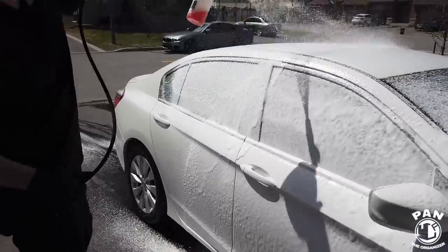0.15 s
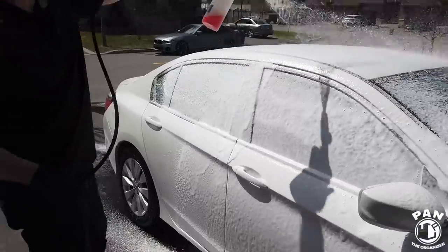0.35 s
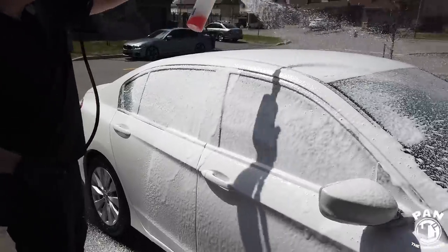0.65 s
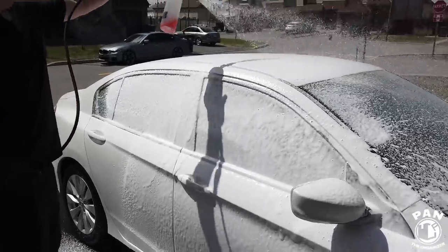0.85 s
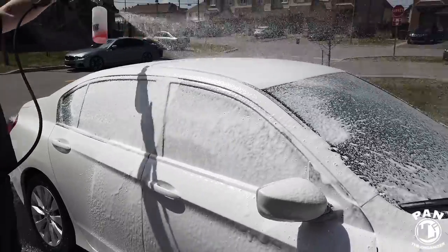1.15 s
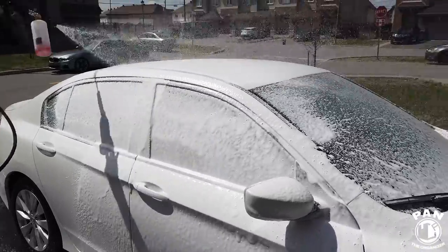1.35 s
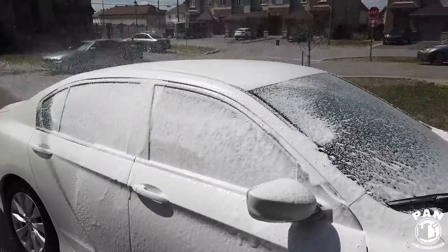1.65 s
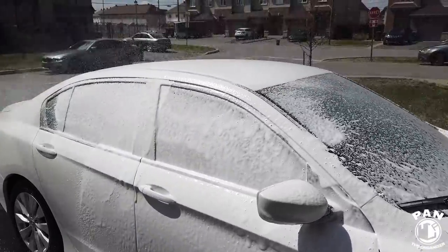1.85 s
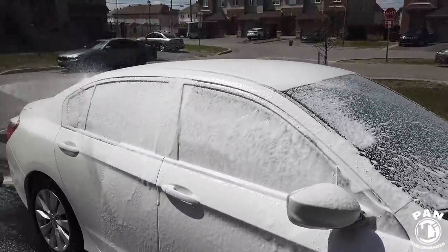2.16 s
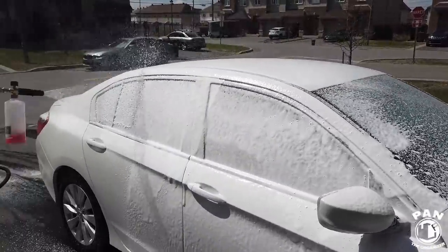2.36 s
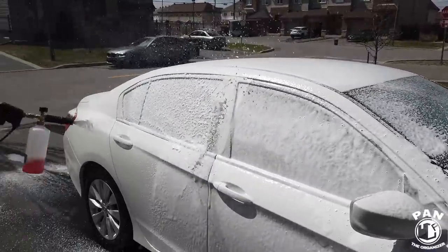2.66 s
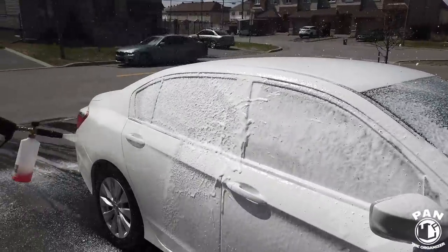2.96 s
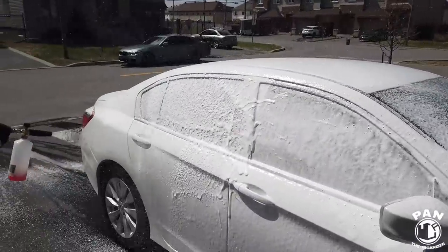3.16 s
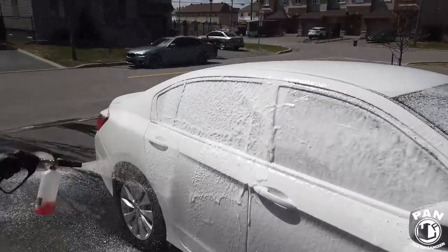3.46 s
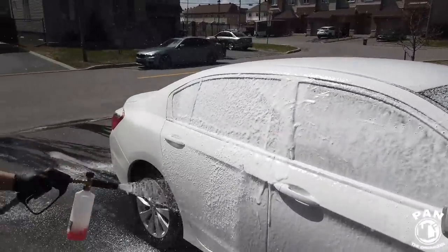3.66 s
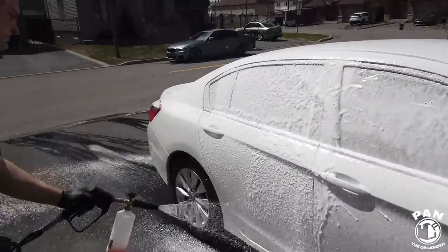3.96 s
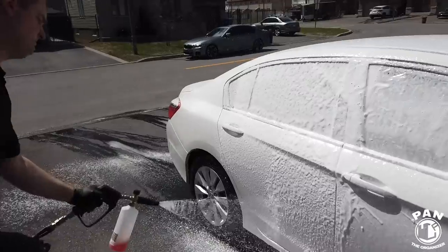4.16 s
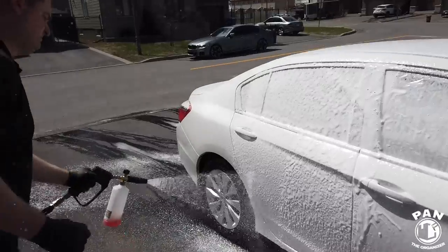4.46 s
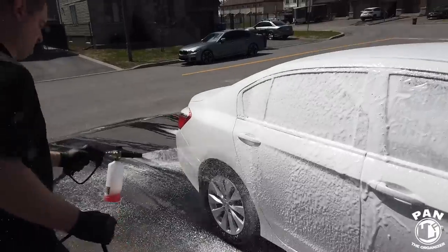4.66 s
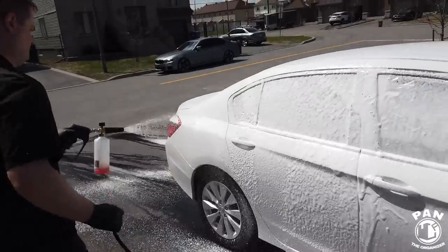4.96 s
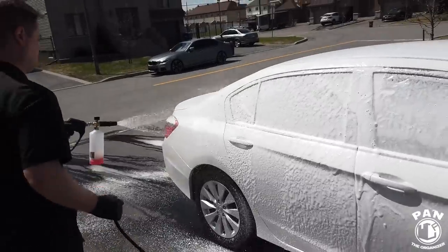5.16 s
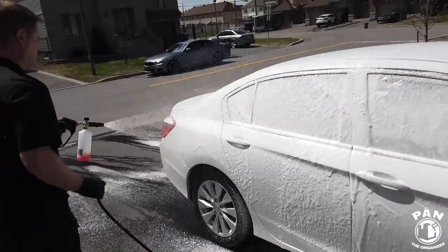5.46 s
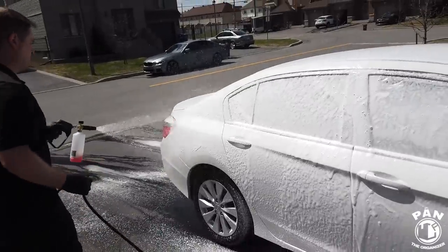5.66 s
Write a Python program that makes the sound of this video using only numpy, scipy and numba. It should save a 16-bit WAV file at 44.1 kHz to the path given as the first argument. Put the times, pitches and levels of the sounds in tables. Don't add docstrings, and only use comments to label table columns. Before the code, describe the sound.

Outdoors on a quiet street, a foam cannon sprays a car with a continuous airy hiss and a breathy, wavering whistle near 2 kHz. Panels drum softly as the fan crosses; the hiss dips near two seconds, then turns brighter and sharper until about four. A pressure washer drones faintly behind. Wind thumps the close stereo microphones around 1.6 and 5 seconds.

```python
import sys
import numpy as np
from scipy import signal
from scipy.io import wavfile
from scipy.ndimage import uniform_filter1d
from numba import njit

SR = 44100
rng = np.random.default_rng(int(sys.argv[2]) if len(sys.argv) > 2 else 0)


def dump_mix(stems):
    frames = np.atleast_2d(stems).T
    limited = np.clip(frames, -1, 1)
    pcm = np.round(limited * 32767).astype(np.int16)
    wavfile.write(sys.argv[1], SR, pcm)


def gain_from_decibels(decibels):
    exponent = np.asarray(decibels, float) / 20
    return 10 ** exponent


N = 256220

# time [s], nearness [dB], jet turned to the microphones [dB],
# mist falling back [dB].
SPRAY_CURVE = [(0, -40.5, -3.5, -2), (.87, -43, -3, -2.5), (1.05, -41.5, -9, -11.5),
               (1.35, -40.5, -9.5, -10.5), (1.7, -44.5, -5.5, -2.5), (1.9, -47, -0.5, -1.5),
               (2.17, -43, -3.5, -1.5), (2.28, -44, 3.5, -1.5), (2.46, -39.5, 4, -2.5),
               (2.62, -42, 5.5, -2), (2.85, -38.5, 3, -2.5), (3.15, -42, 8, 2), (3.4, -44, 8.5, -1),
               (3.62, -44.5, 12, 3.5), (3.95, -38.5, 5, -2), (4.6, -41, 5, -1), (4.95, -43.5, 2.5, -2.5),
               (5.81, -49.5, 3.5, -3)]
# time [s], nozzle lag at the left port [ms], its direct share [0-1],
# jet lag [ms], its direct share [0-1].
AIM_CURVE = [(0, 0.093, 0.5, 0.1, 0.1), (.3, 0.063, 0.78, 0.15, 0.35), (.9, 0.071, 0.8, 0.12, 0.13),
             (1.3, 0.17, 0.71, 0.22, 0.35), (1.9, 0.23, 0.6, .26, 0.56), (2.35, 0.21, 0.68, 0.25, 0.27),
             (2.65, .18, 0.61, 0.31, 0.04), (2.75, 0.21, 0.73, .01, 0.27), (3.15, .21, 0.75, .004, 0.5),
             (3.6, 0.2, 0.7, .004, 0.52), (3.9, .21, .6, 0.0046, .6), (4.3, 0.18, 0.72, .004, 0.57),
             (4.8, .21, 0.71, .004, 0.54), (5.8, 0.21, 0.7, .004, 0.55)]
CHURN_TOP_HZ = 3250


def rms_one(x):
    return x / np.sqrt(np.mean(x ** 2) + 1e-20)


def in_time(rows):
    s, *columns = np.transpose(rows)
    return [np.interp(np.arange(N) / SR, s, c) for c in columns]


def at_hz(points, hz):
    point_hz, db = np.transpose(points)
    return np.interp(np.log(hz), np.log(point_hz), db)


def drift(rate_hz):
    r = np.exp(-80 * np.pi * rate_hz / SR)
    slow = signal.lfilter([1], [1, -2 * r, r * r], rng.standard_normal(N // 40 + 2002))[2000:]
    return np.interp(np.arange(N) / 40, np.arange(len(slow)), rms_one(slow))


def band(x, low_hz, high_hz, order=2):
    return signal.sosfilt(signal.butter(order, [low_hz, high_hz], "band", fs=SR, output="sos"), x)


def swells(s, fall_s, db, rest_db):
    t = np.arange(0, N + 64, 64)[:, None] / SR
    event_db = db - 10 * np.abs(t - s) / np.maximum(fall_s, .01)
    power = gain_from_decibels(2 * event_db).sum(axis=1) + gain_from_decibels(2 * rest_db)
    return np.interp(np.arange(N) / SR, t[:, 0], 10 * np.log10(power))


def evened(x, window_s):
    power = uniform_filter1d(x ** 2, int(window_s * SR), axis=1)
    return rms_one(x / np.sqrt(.3 + power))


def centred(low_hz, high_hz, level_db, side_db):
    noise = rms_one(band(rng.standard_normal((2, N)), low_hz, high_hz))
    mid, side = noise * gain_from_decibels(level_db + 2.0 * drift(2.5))
    return mid + gain_from_decibels(side_db) * side * [[1], [-1]]


def shares(rows, share):
    share = np.clip(share, 0, 1)
    return rows * np.sqrt([share, 1 - share, 1 - share])


def at_ports(rows, lag_ms, flank_db, ground_db, flank_turn, ground_turn):
    # time [s], extra path by way of the car's flank [ms].
    flank_curve = [(0, 1.81), (.9, 0.95), (1.1, 1.31), (1.75, 1.55), (1.9, 1.13), (2.85, 0.93), (3.3, 1.43),
                   (3.7, 1.5), (4.45, 0.946), (5.1, 0.97), (5.2, 1.27), (5.8, 1.26)]
    (flank_ms,) = in_time(flank_curve)
    ground_ms = 5.7 - .62 * np.arange(N) / SR
    out = rows[1:].copy()
    smooth = signal.resample_poly(rows[0], 4, 1)
    paths = [(0, 0, 1), (flank_db, flank_ms, flank_turn), (ground_db, ground_ms, ground_turn)]
    for level_db, path_ms, turn in paths:
        for port, side in enumerate((1, -1)):
            at = np.arange(N) - (path_ms + side * turn * lag_ms / 2) * SR / 1000
            out[port] += gain_from_decibels(level_db - 2.5) * np.interp(4 * at, np.arange(len(smooth)), smooth)
    return out


def mouth():
    spray_db, _, _ = in_time(SPRAY_CURVE)
    lag_ms, share, _, _ = in_time(AIM_CURVE)
    churn = foam(2140, CHURN_TOP_HZ, spray_db - 3.0, patchy_db=1.5) + hollows(0, CHURN_TOP_HZ)
    rows = shares(intake(), 1.33 * share) + shares(churn, 1.05 * share)
    return at_ports(rows, lag_ms, flank_db=-5.0, ground_db=-4, flank_turn=0.89, ground_turn=0.96)


def landing():
    # time [s], splash thrown back against nearness [dB],
    # lag at the left port [ms], direct share [0-1].
    splash_curve = [(0, -10, 0.12, 0.35), (.9, -8, 0.12, 0.44), (1.1, -15.5, 0.16, 0.46),
                    (1.3, -14, 0.22, 0.54), (1.6, -13, .23, 0.5), (2.05, -17, 0.29, .6),
                    (2.25, -12.5, .25, 0.3), (2.7, -10.5, 0.23, 0.34), (3.0, -7.5, 0.25, 0.4),
                    (3.4, -8.5, .27, 0.34), (3.8, -7.5, 0.28, 0.46), (4.2, -8.5, 0.27, 0.3),
                    (4.6, -9.5, .28, 0.5), (4.9, -11, 0.29, 0.5), (5.3, -10, 0.29, 0.34),
                    (5.81, -5.5, 0.3, 0.5)]
    spray_db, _, mist_db = in_time(SPRAY_CURVE)
    splash_db, lag_ms, share = in_time(splash_curve)
    rows = foam(CHURN_TOP_HZ, 4256, spray_db - 5.0, patchy_db=2.2) + hollows(CHURN_TOP_HZ, SR)
    rows += foam(4240, 5290, spray_db + splash_db, patchy_db=1.0)
    rows += foam(5235, 7520, spray_db + mist_db - 0.7, patchy_db=1.5)
    rows = shares(rows, share)
    return at_ports(rows, lag_ms, flank_db=-6.5, ground_db=-5.5, flank_turn=0.88, ground_turn=0.99)


def jet():
    spray_db, facing_db, _ = in_time(SPRAY_CURVE)
    _, _, lag_ms, share = in_time(AIM_CURVE)
    jet_db = spray_db + facing_db + 0.1
    hiss = foam(7640, 16720, jet_db, patchy_db=1.5, shade=0.066 * (jet_db + 36))
    rows = shares(hiss, 1.27 * share)
    return at_ports(rows, lag_ms, flank_db=-15, ground_db=-20, flank_turn=.6, ground_turn=.9)


@njit
def resonate(x, cosine, r):
    y = np.zeros_like(x)
    for c in range(x.shape[0]):
        for i in range(2, x.shape[1]):
            y[c, i] = x[c, i] - x[c, i - 2] + 2 * r * cosine[i] * y[c, i - 1] - r * r * y[c, i - 2]
    return y


def intake():
    # time [s], suction [dB], resonance [Hz].
    suction_curve = [(0.0, -44, 2030), (0.08, -40, 2027), (0.39, -38, 2050), (0.66, -42.5, 2060),
                     (0.79, -43.5, 1990), (1.08, -40.5, 2030), (1.5, -47.5, 2030), (1.78, -47, 2060),
                     (1.9, -40.5, 1960), (2.3, -44.5, 1980), (2.75, -40.5, 2025), (3.03, -46.5, 1940),
                     (3.19, -41.5, 1990), (3.9, -49, 1923), (4.37, -44, 1975), (4.75, -47.5, 2020),
                     (5.05, -42, 2064), (5.3, -46, 1930), (5.81, -47.5, 1980)]
    suction_db, centre_hz = in_time(suction_curve)
    width_hz, core_width_hz, core_db, gulp_db = 260, 70, -1.0, 1.36
    cosine = np.cos(2 * np.pi * centre_hz * (1 + .006 * drift(6)) / SR)
    air = rng.standard_normal((2, 3, N))
    wide = resonate(air[0], cosine, np.exp(-np.pi * 3 * width_hz / SR))
    wide = resonate(wide, cosine, np.exp(-np.pi * width_hz / SR))
    core = resonate(air[1], cosine, np.exp(-np.pi * core_width_hz / SR))
    both = rms_one(wide) + gain_from_decibels(core_db + 0.28 * drift(3.0)) * rms_one(core)
    both = signal.sosfilt(signal.butter(4, 1660, "high", fs=SR, output="sos"), both)
    return rms_one(both) * gain_from_decibels(suction_db + 4.0 + gulp_db * drift(15))


def foam(low_hz, high_hz, level_db, patchy_db, shade=0.):
    # frequency [Hz], density [dB per Hz].
    colour = [(2300, -1), (2750, 0), (3950, -3), (4350, -8.5), (5030, -9), (6000, 0), (7650, -4),
              (9300, -3.5), (10000, -1.5), (10450, 1.5), (11000, -7), (11900, -6.5), (15100, -11.5),
              (16500, -15)]
    out, together, white = 0, drift(15.0), rng.standard_normal((2, 3, N))
    edges = np.geomspace(low_hz, high_hz, 2 + int(9 * np.log2(high_hz / low_hz)))
    for k, (low, high) in enumerate(zip(edges, edges[1:])):
        hz = np.sqrt(low * high)
        swell_db = patchy_db * (0.32 * together + drift(1.65) + 0.8 * drift(15.4))
        shade_db = shade * max(np.log2(hz / 11000), 0)
        out = out + gain_from_decibels(at_hz(colour, hz) + swell_db + shade_db) * band(white[k % 2], low, high)
    return rms_one(out) * gain_from_decibels(level_db)


def hollows(low_hz, high_hz):
    # moment [s], time to fall 10 dB [s], resonance [Hz], level [dB].
    cavities = [(.1, 0.1, 2450, -47), (.17, -0.2, 6050, -42), (.24, -0.7, 4048, -48), (.31, 0.8, 3400, -58),
                (.64, 0.3, 3860, -44.5), (.75, -0.5, 3270, -47), (1.0, 0.2, 2580, -53),
                (1.46, -0.2, 3600, -58), (1.65, -0.24, 2080, -50), (1.83, -0.16, 1660, -48),
                (2.05, 0.4, 6040, -49.5), (2.07, .1, 1830, -44), (2.26, .1, 1809, -42.5),
                (2.42, 0.46, 2842, -47.5), (2.45, .15, 12500, -51), (2.5, -0.47, 2200, -47),
                (2.53, 0.75, 3962, -57), (2.53, 0.1, 8484, -45), (2.7, .12, 3450, -51),
                (3.0, 0.24, 9400, -44), (3.64, 0.25, 2130, -45), (3.64, -0.3, 2929, -55),
                (3.9, -0.2, 3600, -50), (3.95, 0.5, 3400, -54), (4.07, -0.6, 2584, -46),
                (4.24, 0.5, 5125, -56), (4.4, -0.3, 6300, -53), (4.43, 0.8, 3058, -46),
                (4.47, 0.6, 2390, -53), (4.56, 0, 3850, -49), (4.62, 0.5, 5685, -47.5), (4.9, 1, 8500, -51),
                (5.01, -0.3, 3488, -52), (5.3, 1, 12200, -57), (5.45, 0.1, 1800, -51.5),
                (5.51, .12, 3550, -56), (5.66, 0.5, 1938, -60)]
    q = 21
    out, air = np.zeros((3, N)), rng.standard_normal((3, N))
    for s, fall_s, hz, db in cavities:
        if not low_hz <= hz < high_hz:
            continue
        fall_s = max(fall_s, .02)
        a, b = max(int((s - 3 * fall_s) * SR), 0), min(int((s + 3 * fall_s) * SR), N)
        rung = rms_one(band(air[:, a:b], hz * (1 - .5 / q), hz * (1 + .5 / q), order=1))
        out[:, a:b] += rung * gain_from_decibels(db - 10 * ((np.arange(a, b) / SR - s) / fall_s) ** 2)
    return out


def panels():
    # moment [s], time to fall 10 dB [s], level [dB].
    crossings = [(0.0, -5.5, -59.5), (.5, 0.3, -47), (1.0, 1.1, -49), (1.4, -0.35, -41),
                 (1.83, 0.17, -44.5), (2.25, 0.5, -44.5), (2.6, 0.24, -44.5), (2.879, 0.28, -42.5),
                 (3.3, -0.6, -54), (3.79, 4, -65), (4.04, 0.43, -46.5), (4.32, -1, -59),
                 (5.23, -0.06, -45.5), (5.5, 0.45, -52.5), (5.71, 0.6, -54.5)]
    return centred(1445, 2115, swells(*np.transpose(crossings), rest_db=-68), side_db=-9.5)


def pump():
    return drone() + rattle()


def drone():
    # time [s], turns per second [Hz].
    shaft_curve = [(0, 26.32), (1.15, 26.343), (1.9, 26.319), (2.8, 26.315), (3.6, 26.299), (4.8, 26.29),
                   (5.8, 26.31)]
    tracked_orders = [25, 29, 35, 39]
    other_orders = {15: -19.5, 17: -15.5, 19: -19.5, 20: -16.5, 21: -14, 22: -16.5, 24: -11, 27: -11.5, 28:
                    -7.5, 30: -30, 31: -37, 33: -6, 36: -3, 37: -2.5, 38: -15, 41: -13, 43: -32, 45: -15,
                    47: -9.5, 51: -11, 53: -32, 59: -2.5, 61: -7}
    (shaft_hz,), groups = in_time(shaft_curve), pump_groups()
    turn = 2 * np.pi * np.cumsum(shaft_hz) / SR
    tones = gain_from_decibels(-74.5) * np.sqrt(2) * np.sin(2 * np.pi * 120.3 * np.arange(N) / SR)
    for order, offset_db in {**other_orders, **dict.fromkeys(tracked_orders)}.items():
        place = np.interp(order, tracked_orders, range(len(groups))) if order > 23 else 1
        near = sum(max(1 - abs(place - j), 0) * gain_from_decibels(db) for j, db in enumerate(groups))
        if offset_db is None:
            gain = near * gain_from_decibels(drift(7.0))
        else:
            gain = near * gain_from_decibels(offset_db + 1.7 * drift(0.9))
        tones = tones + np.sqrt(2) * gain * np.sin(order * turn + rng.uniform(0, 2 * np.pi))
    return tones


def pump_groups():
    plain_db = [-61.5, -53.5, -58, -63]
    # moment [s], half length [s], group (rounded), change [dB].
    beats = [
        (1.52, 0.49, 0, -23),
        (1.55, 0.94, 3, 7.5),
        (2.85, 0.37, 2, -4),
        (3.9, 0.25, -4.5, -3),
        (4.05, 0.79, 1, -9),
        (4.5, .3, 2, -9),
        (4.995, 0.36, 2, 6.5),
        (5.25, 0.7, 3, -16),
        (5.7, 0.71, 0.5, -5),
    ]
    turned_from_s, turning_db_per_s = 2.87, [0.44, -5, -4.5, -2]
    t = np.arange(N) / SR
    turned_s = np.maximum(t - turned_from_s, 0)
    levels = [db + slope * turned_s for db, slope in zip(plain_db, turning_db_per_s)]
    for s, half_s, group, db in beats:
        group = int(round(group))
        levels[group] = levels[group] + db * np.maximum(1 - np.abs(t - s) / half_s, 0)
    return levels


def rattle():
    # frequency [Hz], density [dB per Hz].
    housing = [(150, -14.5), (300, -21), (530, -7), (620, -4), (750, -0.5), (840, -3), (930, -2),
               (1090, -2), (1500, -10.5), (1900, -5)]
    low_end_db = 6 - 2 * np.arange(N) / SR
    edges, white, noise = 150 * 2 ** np.arange(0, 3.8, .25), rng.standard_normal((2, 2, N)), 0
    for k, (low, high) in enumerate(zip(edges, edges[1:])):
        level_db = at_hz(housing, low) + low_end_db * (high < 640)
        noise = noise + gain_from_decibels(level_db) * band(white[k % 2], low, high)
    mid, side = rms_one(noise) * gain_from_decibels(-55.0)
    return mid + gain_from_decibels(-13.0) * side * [[1], [-1]]


def wind():
    out, lumps_db = 0, 2.2 * drift(9.0)
    eddies = [(16.4, 67.0, .05), (61.4, 159, .55), (147, 515, .45)]
    for level_db, (low_hz, high_hz, alike) in zip(gusts(), eddies):
        noise = rms_one(band(rng.standard_normal((2, N)), low_hz, high_hz))
        mid, side = evened(noise, 1.23 / low_hz)
        width = np.sqrt((1 - alike) / (1 + alike))
        out = out + gain_from_decibels(level_db - 0.3 + lumps_db) * (mid + width * side * [[1], [-1]])
    return signal.sosfilt(signal.butter(2, 680, fs=SR, output="sos"), out)


def gusts():
    # moment [s], time to fall 10 dB [s], level [dB], fineness of the eddies [dB].
    gust_rows = [(0.0, -0.2, -54, 4), (0.131, 0, -44.5, 3), (.24, 0.4, -55.5, -9), (.39, -1, -67, -11),
                 (.6, 0.44, -62, 3.5), (.8, -0.1, -57, 2), (.95, 0.1, -61, 1.5), (1.03, .06, -54, 6),
                 (1.13, 0, -52, 3), (1.2, 0.05, -53, -1), (1.32, 0.7, -56, -9), (1.455, 0.07, -45, -4.5),
                 (1.54, 0.04, -46, -2), (1.59, 0.0554, -38, -1), (1.63, 0.01, -41, 3.5),
                 (1.683, .03, -46, 8.5), (1.736, .03, -43.5, 5.5), (1.81, 0.035, -48.5, 9.5),
                 (1.9, 0.3, -59, -5), (2.02, -0.12, -51, 1), (2.23, 0.03, -49, 5), (2.34, 0.01, -46.5, 2),
                 (2.46, 0.2, -57.5, -1), (2.57, 0.9, -67, -8), (2.64, 0.09, -50.5, 1.5), (2.77, 0, -59, 6),
                 (2.95, 0.05, -60, 3.5), (3.09, 0, -54, 6), (3.25, -0.2, -57, 2), (3.71, .06, -60, 0),
                 (3.92, -0.2, -66, 4), (4.29, 0, -60, -5), (4.43, .07, -68, -1.5), (4.56, 0.05, -55, -1),
                 (4.85, .04, -56, -3), (4.92, 0.07, -51, -5), (4.971, -0.02, -47.5, 6),
                 (5.016, 0.0254, -33, 1.5), (5.085, 0.03, -44, -2.5), (5.13, 0.01, -41, 4),
                 (5.21, 0.15, -49, -5), (5.3, 0.18, -53.5, -3), (5.38, 0.07, -50, 0.5)]
    s, fall_s, db, fine_db = np.transpose(gust_rows)
    peaks_db = [db, db - 5 + fine_db, db - 13.5 + 1.1 * fine_db]
    lulls_db = [-69.5, -76.5, -70.5]
    return [swells(s, fall_s, peak, lull) for peak, lull in zip(peaks_db, lulls_db)]


def street():
    # moment [s], time to fall 10 dB [s], level [dB].
    cars = [
        (0.0, 0, -65),
        (.66, -0.07, -58),
        (2.0, 0.5, -63.5),
        (3.7, 0.5, -63),
        (4.2, 0.77, -57.5),
        (4.72, -3, -57),
        (5.8, 0.5, -65),
    ]
    return centred(285, 487, swells(*np.transpose(cars), rest_db=-81), side_db=-29)


def scene():
    cannon = mouth() + landing() + jet()
    return cannon + panels() + pump() + street() + wind()


def low_pass(x):
    return signal.sosfilt(signal.butter(12, 15830, fs=SR, output="sos"), x)


def record(dry):
    mid, side = dry.sum(axis=0) / 2, (dry[0] - dry[1]) / 2
    side = side - 0.36 * band(side, 990, 1170, order=1)
    return low_pass(np.array([mid + side, mid - side]))


dry = scene()
out = record(dry)
dump_mix(out)
```